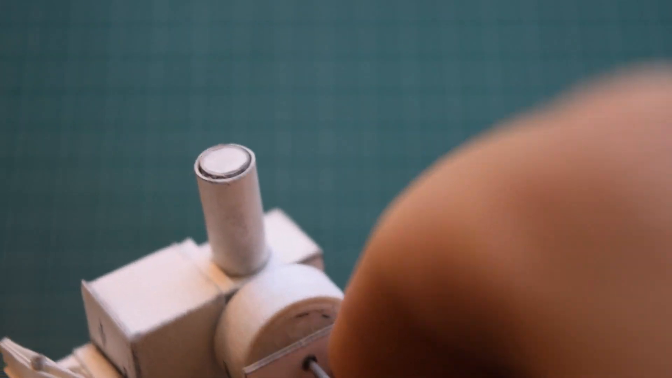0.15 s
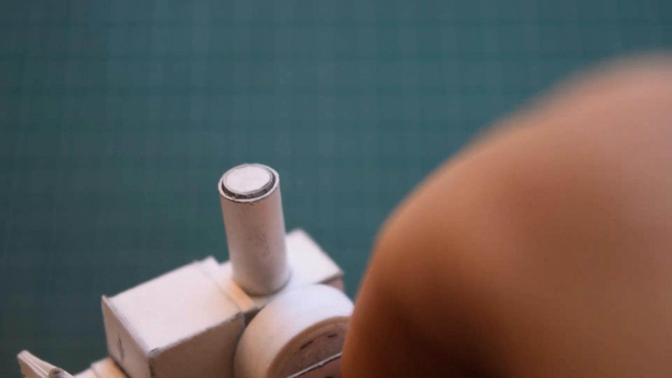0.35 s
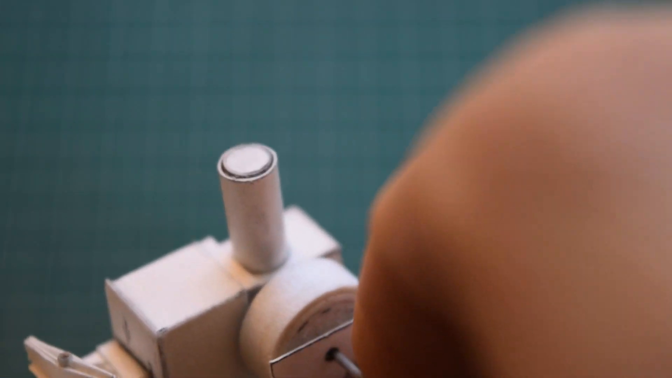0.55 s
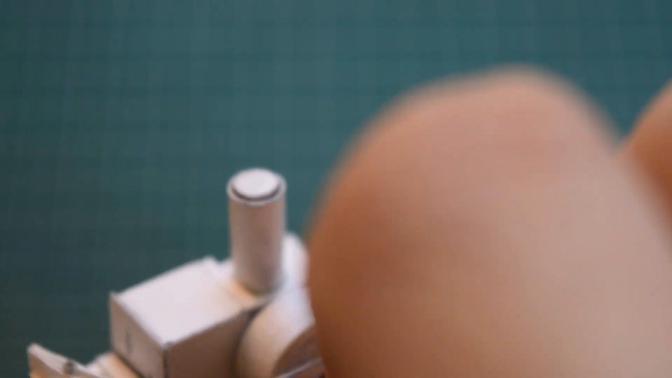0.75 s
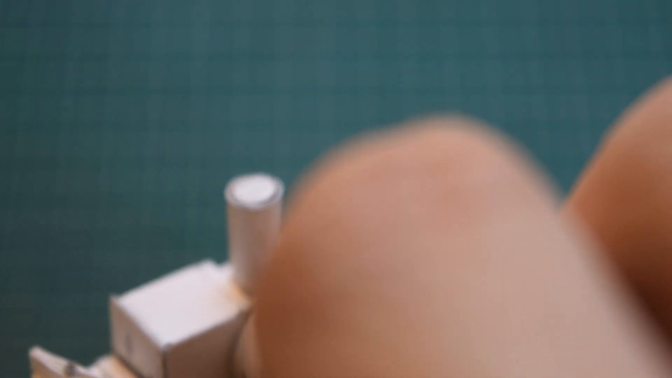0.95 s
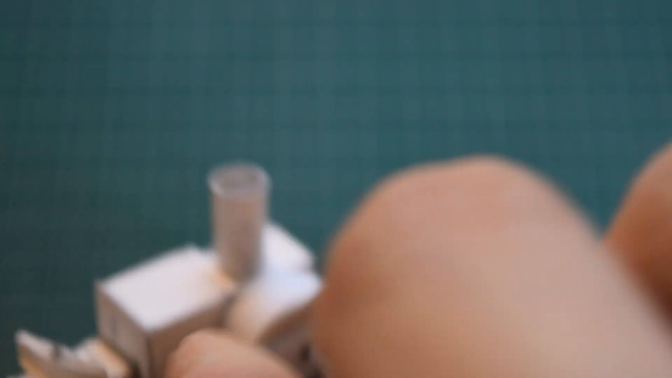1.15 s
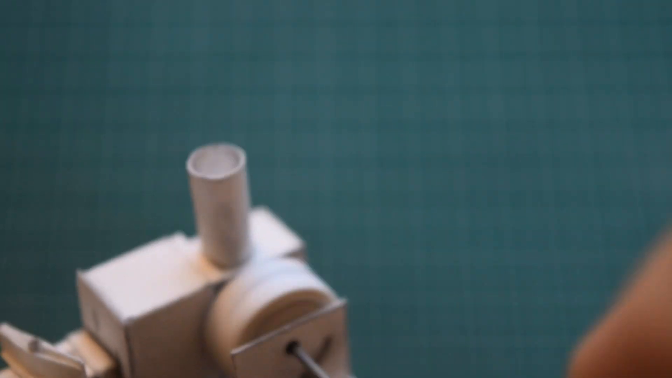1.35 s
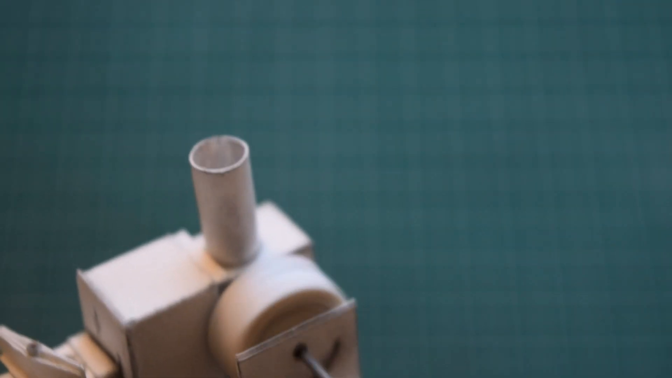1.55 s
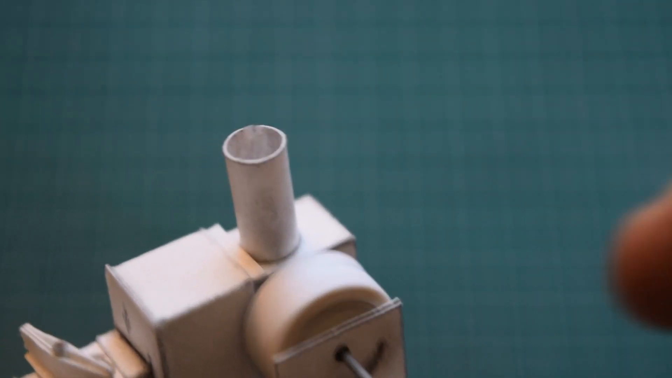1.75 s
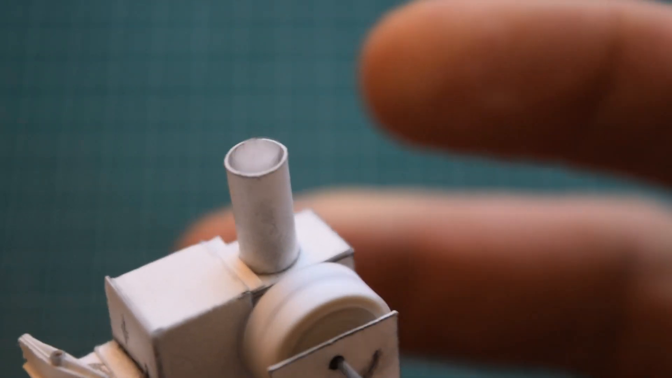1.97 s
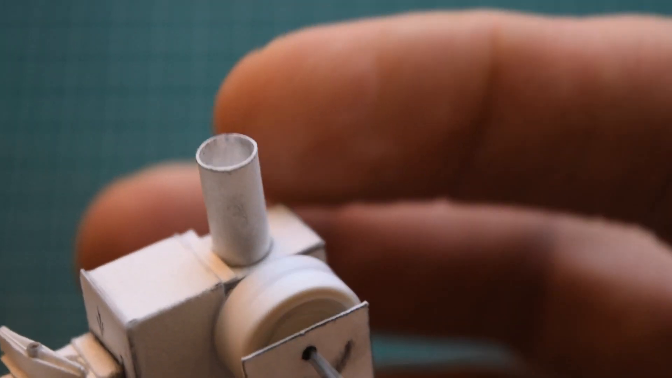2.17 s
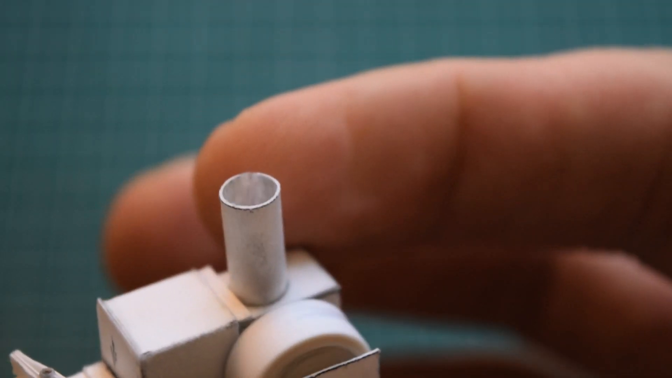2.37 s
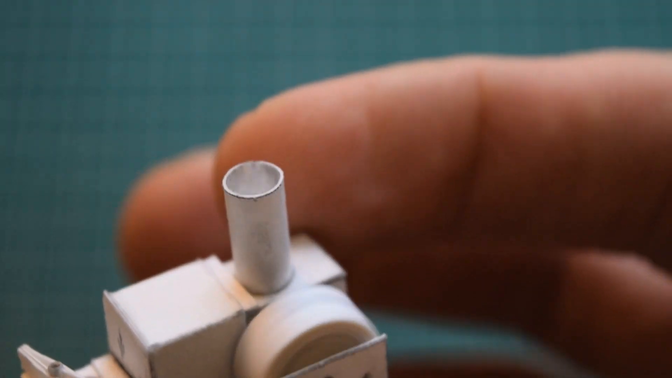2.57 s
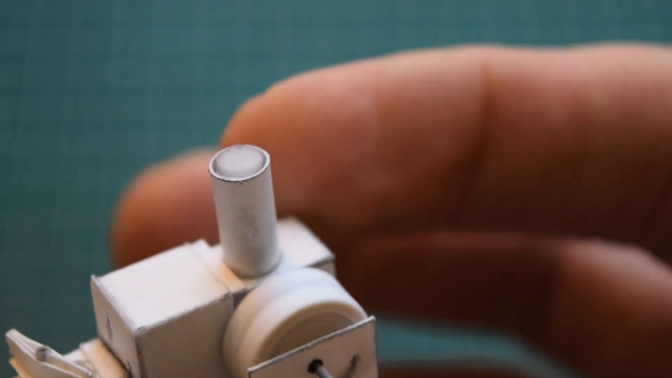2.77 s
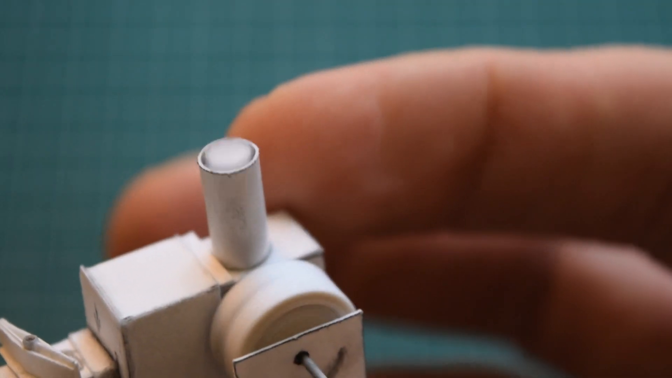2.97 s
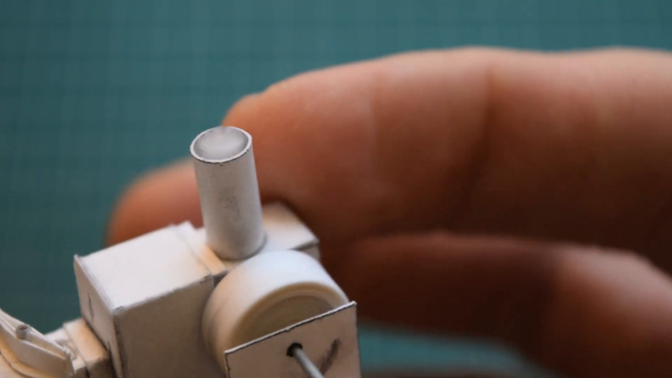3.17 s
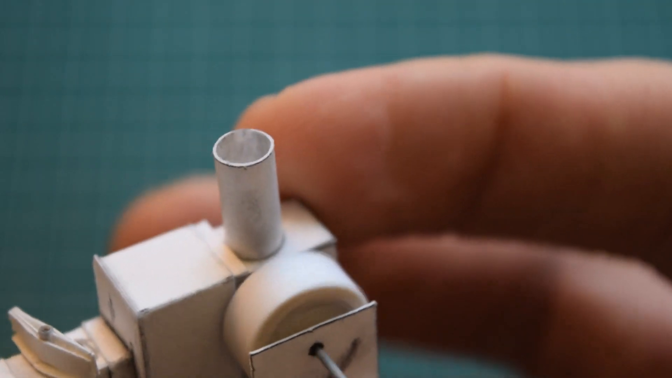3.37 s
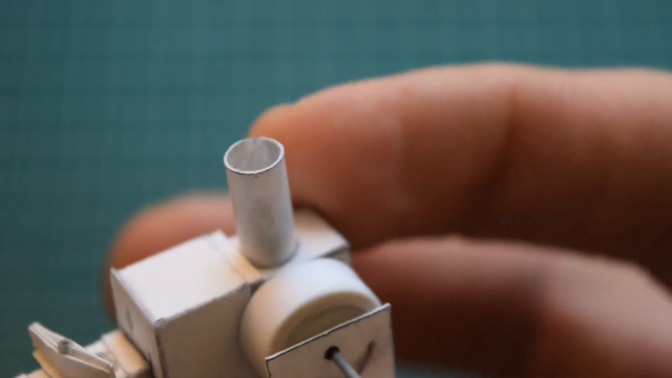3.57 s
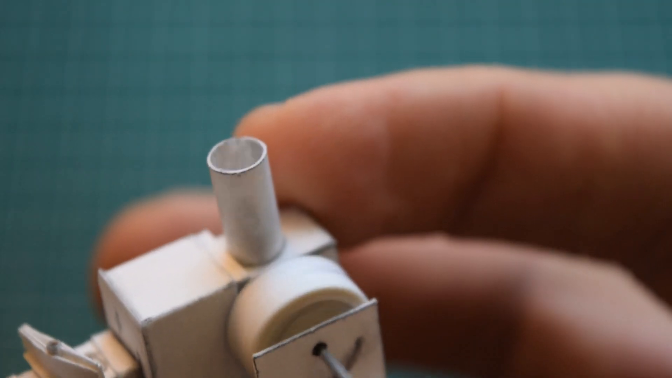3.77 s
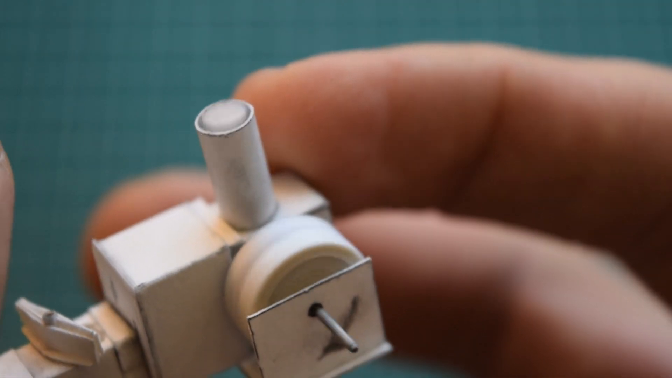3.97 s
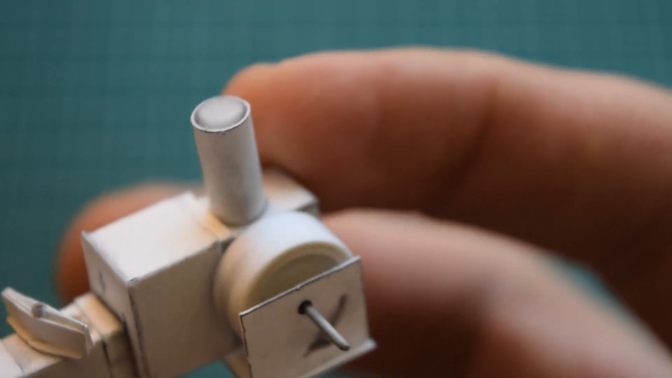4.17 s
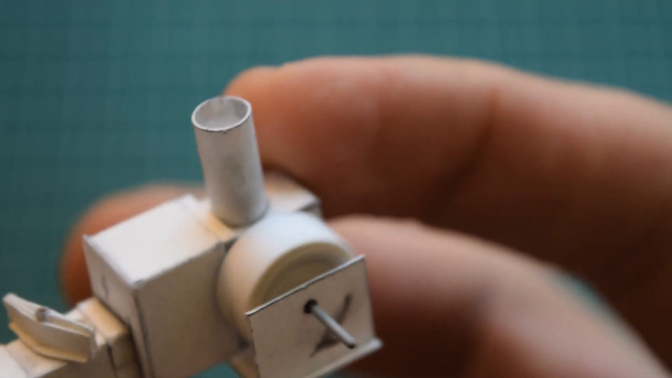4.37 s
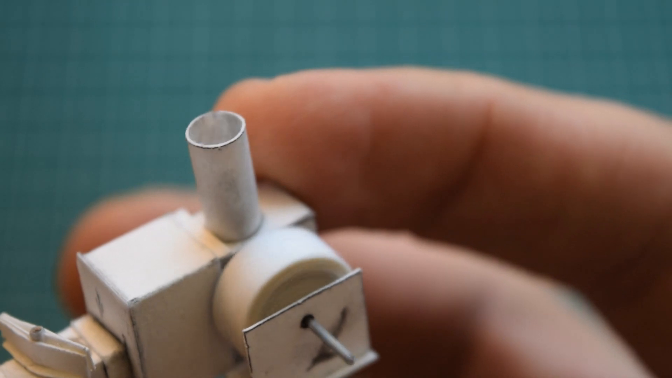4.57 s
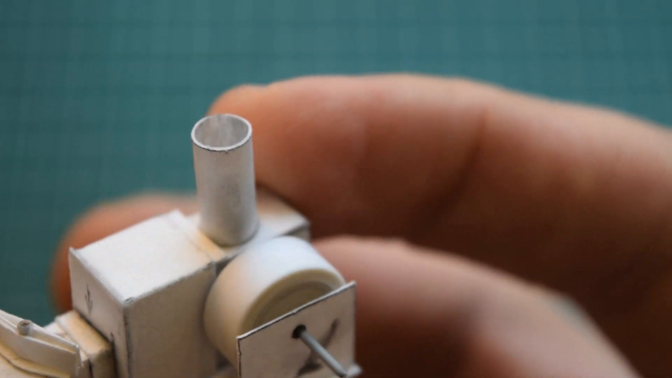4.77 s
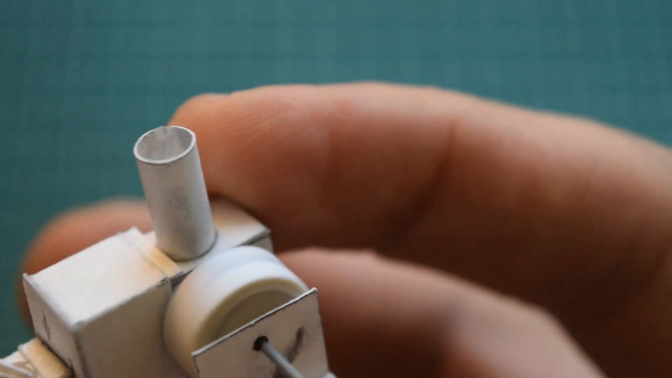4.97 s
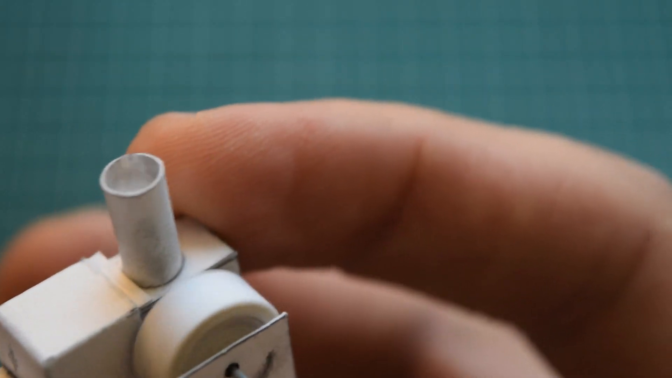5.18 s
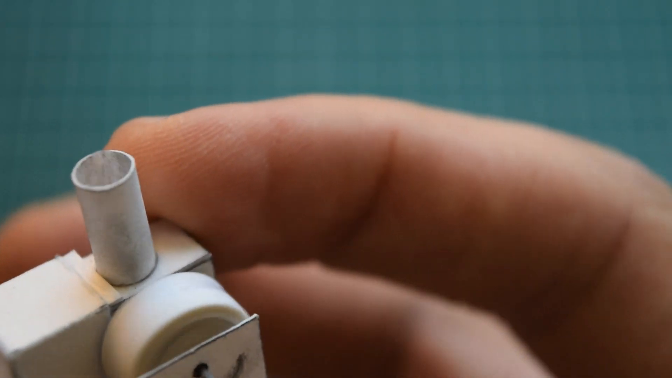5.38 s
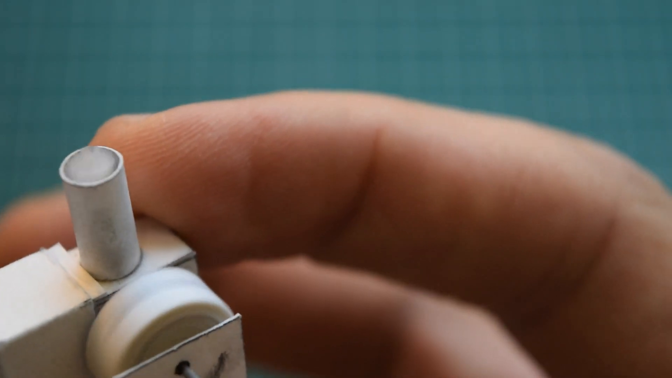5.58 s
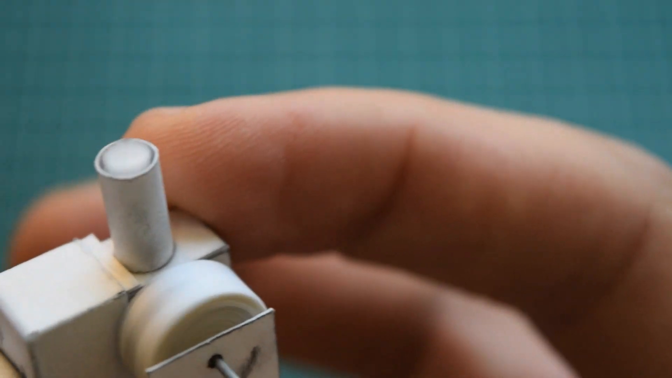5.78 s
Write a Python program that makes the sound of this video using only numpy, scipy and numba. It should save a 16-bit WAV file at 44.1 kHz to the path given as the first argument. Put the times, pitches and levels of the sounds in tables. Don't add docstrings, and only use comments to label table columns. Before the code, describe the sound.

Very close stereo pickup of a miniature air-driven motor above a table. Faint hiss and tiny finger touches come first. At about 1.1 seconds it springs into motion, briefly racing, then buzzes continuously: rapid papery flutter, hissing air jets and small thumps, slightly louder after half a second, wavering a little in speed, still running at the cut.

```python
import sys
import numpy as np
from scipy import signal
from scipy.fft import rfft, irfft
from scipy.io import wavfile
from scipy.ndimage import uniform_filter1d
from numba import njit

SR = 44100
rng = np.random.default_rng(int(sys.argv[2]) if len(sys.argv) > 2 else 0)


def store_wav(level_fs):
    pcm = np.round(np.clip(np.atleast_2d(level_fs), -1, 1) * 32767)
    wavfile.write(sys.argv[1], SR, pcm.T.astype(np.int16))


def makeup_ratio(level_db):
    decades = np.asarray(level_db, float) / 20
    return 10 ** decades


N = 257103
T = np.arange(N) / SR
HZ = np.arange(4097) * SR / 8192 + 1
START_S = 1.1
RUN_S = np.clip(T - START_S, 0, None)
CYLINDER_HZ, CYLINDER_HZ_PER_S = 1622, 66.5
CYLINDER_PATH_HZ = CYLINDER_HZ + CYLINDER_HZ_PER_S * RUN_S

# [start_s, speed_hz (turns per second)]
CRANK = [(1.1, 35.762), (1.84, 35.451), (2.02, 35.316), (2.23, 36.058), (2.29, 34.826), (2.68, 34.305),
         (3.13, 34.279), (3.28, 33.832), (3.61, 34.739), (3.91, 33.395), (4.09, 34.254), (4.27, 33.717),
         (4.6, 34.765), (4.75, 34.453), (4.93, 33.521), (5.08, 33.789), (5.62, 33.811), (5.83, 34.434)]
FLICK_HZ, FLICK_RISE_S, FLICK_FADE_S = 33.71, .0271, .0496


def crank():
    fade = np.exp(-np.clip(RUN_S - FLICK_RISE_S, 0, None) / FLICK_FADE_S)
    flick = np.clip(RUN_S / FLICK_RISE_S, 0, 1) * fade
    return np.interp(T, *np.transpose(CRANK), left=0) + FLICK_HZ * flick, flick


def valve_openings(speed_hz):
    turns = np.cumsum(speed_hz) / SR
    luck = rng.standard_normal((int(turns[-1]) + 1, 8))
    opening = np.interp(np.arange(len(luck)), turns, T) + .00075 + .00005 * luck[:, 7]
    period = 1 / np.interp(np.maximum(opening, START_S + 2 / SR), T, speed_hz)[:, None]
    return opening, period, luck


def flutter(opening, period, luck):
    chance = rng.standard_normal((2, len(luck), 8))
    gaps_s = .00198 * (1 + .03 * chance[0] + .008 * luck[:, 6:7])
    beat = .0012 + np.cumsum(gaps_s, axis=1)
    swing = np.exp(-((beat / period - .27) / .17) ** 2) * (beat < .39 * period)
    return clicks(opening[:, None] + beat, swing * makeup_ratio(1.6 * chance[1]))


def air_flow(opening, period, luck):
    turn = np.clip(np.searchsorted(opening, T) - 1, 0, None)
    share = (T - opening[turn]) / period[turn, 0]
    open_share = 0.46 + 0.004 * luck[turn, 0]
    shut = np.clip(share - open_share, 0, None)
    drain = 0.53 * np.exp(-shut / 0.037) + 0.11 * np.exp(-shut / 0.11)
    flow = (share > 0) * drain * makeup_ratio(0.81 * luck[turn, 5])
    swell = np.exp(-(np.minimum(share - .33, 0) / 0.25) ** 2)
    seep = makeup_ratio(-12.5) + 0.27 * np.exp(-np.abs(T - 1.13) / 0.22)
    return share, flow, swell, seep


def gust():
    return rng.standard_normal(N) * np.clip((T - 1.094) / 0.0083, 0, 1) ** 2


# [pitch_hz, width_hz, level_db]
BOX = [(590, 50, -14), (886, 74, 0), (998, 63, 0), (1090, 126, 2.5), (1403, 82, -0.5), (1550, 190, -4.5),
       (2314, 380, -5), (2694, 173, -3.5)]
# [pitch_hz, level_db]
OVERALL_TONE = [(100, -58), (400, -13.5), (520, -11.5), (620, 0.5), (900, 2.5), (1330, 3.5), (1400, -10),
                (1470, 1.5), (2330, 4), (2430, -5), (2540, -0.5), (10000, -2.5), (15500, -8.5)]


def paper_box(share, flow, swell, seep, flaps, puff, flick):
    soft_flaps = uniform_filter1d(flaps, size=9)
    soft_flaps = signal.lfilter([1, -1], [1, -np.exp(-1 / (0.000084 * SR))], soft_flaps)
    early = .3 + .7 * np.exp(-np.clip(share - .37, 0, None) / .05)
    jet = (flow * early * swell ** 0.2 * puff + 0.9 * seep) * gust()
    push = level(jet, 0) + level(soft_flaps, -8)
    box = colour(push, peaks(BOX) + slope(OVERALL_TONE))
    return box + 1.25 * flick * svf(box, 1100 + 0 * T, 200.)


# [pitch_hz, width_hz, level_db]
PASSAGE = [(1700, 267, 1), (3180, 300, 1), (3770, 230, 4.5), (4270, 890, -2.5), (5533, 58, 3),
           (6340, 78, -1.5), (6060, 7200, -7), (12200, 6800, -10.5)]


def valve_passage(flow, seep, opening, settled, luck):
    size = settled * makeup_ratio(1.3 * luck[:, 1:3]) * [1.05, .65]
    ticks = clicks(opening[:, None] + [.00022, .0017], size)
    push = level((flow + 1.53 * seep) * gust(), 0) + level(ticks, -6.5)
    low = 2.26 * svf(push, CYLINDER_PATH_HZ, 166.0)
    high = 1.55 * svf(push, 1.51 * CYLINDER_PATH_HZ, 130.)
    return colour(push + low + high, peaks(PASSAGE) + slope(OVERALL_TONE))


def cylinder_lift(opening, settled, luck):
    size = settled * makeup_ratio(1.8 * luck[:, 1:4]) * [1, .8, .6]
    hits = clicks(opening[:, None] + [.0003, .00142, .0042], size)
    ring = svf(hits, CYLINDER_PATH_HZ, 1500.) - .4 * svf(hits, 1.33 * CYLINDER_PATH_HZ, 400.)
    return svf(ring, CYLINDER_PATH_HZ, 380.)


# [pitch_hz, width_hz, level_db]
EDGE = [(7830, 160, -7), (8520, 160, 2), (9100, 340, 1), (9850, 300, 0), (11170, 1400, -9.5)]
WHISTLE_DB, WHISTLE_DB_PER_S = -8, -0.54
HAND_BACK_S, HAND_TILT_S = 1.68, 4.5


def edge_whistle(share, flow, swell, seep, puff):
    ahead = .4 * (share > .97)
    edge = colour((flow * swell * puff + ahead + 0.66 * seep) * gust(), peaks(EDGE) + slope(OVERALL_TONE))
    bare = np.clip((HAND_BACK_S - T) / .15, 0, 1)
    tilted = np.clip((T - HAND_TILT_S) / .5, 0, 1)
    bare_ring = 0.57 * svf(edge, 9280 + 0 * T, 330.0)
    tilt_ring = 0.58 * svf(edge, 8000 + 0 * T, 500.) - 0.59 * svf(edge, 8650 + 0 * T, 300.)
    edge = edge + bare * bare_ring + tilted * tilt_ring
    return level(edge, 0) * makeup_ratio(WHISTLE_DB + WHISTLE_DB_PER_S * RUN_S)


KNOCKS = [
    (0.002, 1.35),
    (0.392, -0.95),
]
# [pitch_hz, level_db]
CUSHION = [(30, -46), (90, -24.5), (135, -24.5), (200, -23.5), (300, -13), (350, -18.5), (412, -3.5),
           (470, -12), (560, 2.5), (830, 5.5), (960, -4), (1300, -34.5), (5000, -65)]
LID_HZ, LID_WIDTH_HZ, LID_DB = 822, 60., -14


def flow_thumps(opening, period, luck):
    at, size = np.transpose(KNOCKS)
    knocks = clicks(opening[:, None] + at * period, size * makeup_ratio(1.0 * luck[:, 3:5]))
    lid = svf(svf(knocks, LID_HZ + 0 * T, LID_WIDTH_HZ), LID_HZ + 0 * T, 200.0)
    return level(colour(knocks, slope(CUSHION)), -11) + level(lid, LID_DB)


# [pitch_hz, level_db]
EDDIES = [(30, -25), (250, -59), (500, -20), (1100, -40), (1800, 6), (2400, -11), (3200, -0.5),
          (5500, -7.5), (7300, -5.5), (8500, 0.5), (10000, -0.5), (12000, -8), (15500, -18)]


def port_eddies(flow, swell, seep):
    return level(colour((flow * swell + 0.73 * seep) * gust(), slope(EDDIES)), -14.5)


LIFT_DB = -8


def motor():
    speed_hz, flick = crank()
    opening, period, luck = valve_openings(speed_hz)
    settled = np.clip((opening - START_S) / 0.13, .05, 1)[:, None]
    flaps = flutter(opening, period, luck)
    puff = 1 + 0.98 * signal.lfilter([1], [1, -np.exp(-1 / (0.0004 * SR))], flaps)
    share, flow, swell, seep = air_flow(opening, period, luck)
    tone = level(paper_box(share, flow, swell, seep, flaps, puff, flick), 0)
    tone = tone + level(valve_passage(flow, seep, opening, settled, luck), -5.5)
    tone = tone + level(cylinder_lift(opening, settled, luck), LIFT_DB)
    tone = tone + edge_whistle(share, flow, swell, seep, puff)
    tone = tone + flow_thumps(opening, period, luck)
    return tone, port_eddies(flow, swell, seep)


# [start_s, level_db, pitch_hz, width_hz, length_s]
TOUCHES = [(.175, -58, 9000, 1500, .004), (.438, -53, 9000, 4000, .005), (0.524, -52, 5700, 350, .003),
           (.531, -53, 5700, 350, .005), (0.53, -56, 8500, 5000, .012), (.44, -59, 590, 60, 0.022),
           (.52, -57, 3440, 200, .02), (0.794, -52, 620, 60, 0.02), (0.796, -57, 350, 60, 0.02),
           (.905, -62, 9000, 4000, .004), (4.355, -45, 367, 60, 0.026)]


def finger_touches():
    grit = rng.standard_normal(N)
    out = np.zeros(N)
    for start_s, level_db, pitch_hz, width_hz, length_s in TOUCHES:
        rub = np.exp(-((T - start_s - length_s) / length_s) ** 2 * 2) * grit
        gain = makeup_ratio(level_db) * np.sqrt(SR / np.pi / width_hz)
        out = out + gain * svf(rub, pitch_hz + 0 * T, 1. * width_hz)
    return out


# [pitch_hz, level_db (per Hz)]
LEAK = [(20, -13.5), (100, -22), (250, -18), (420, -17), (550, -9), (700, -13), (800, 1), (1100, -0.5),
        (1650, -1.5), (1900, -8), (3500, -16.5), (5000, -23.5), (11500, -24), (15500, -32)]
# [pitch_hz, level_db]
LEAK_SIDE = [(60, -1), (110, -6), (200, -19), (380, -16), (700, -15), (1290, -18.5), (2380, -4),
             (4400, -4.5), (8120, -5), (15000, -2)]
LEAK_DB = -48


def leaking_air():
    mid = level(colour(rng.standard_normal(N), slope(LEAK)), LEAK_DB)
    side = level(colour(rng.standard_normal(N), slope(LEAK)), LEAK_DB)
    return mid + np.array([[1], [-1]]) * colour(side, slope(LEAK_SIDE))


# [pitch_hz, level_db, width_hz]
HUM = [(129, -69.5, 6.3), (171, -75, 4.8), (523.4, -66.5, 1.8), (2210, -64.5, 5.2), (3350, -67, 170)]


def fan_hum():
    return sum(level(svf(rng.standard_normal(N), pitch_hz + 0 * T, 1. * width_hz), level_db)
               for pitch_hz, level_db, width_hz in HUM)


def echoes(x, t60, start):
    s = np.arange(SR // 3) / SR
    tail = rng.standard_normal(len(s)) * makeup_ratio(-60 * s / t60) * (s >= start)
    return signal.oaconvolve(x, tail / np.sqrt(np.sum(tail ** 2)))[:N]


def level(x, db):
    return x * makeup_ratio(db) / np.sqrt(np.mean(x ** 2))


@njit
def svf(x, hz, width):
    y, b, l = np.empty(len(x)), 0., 0.
    for i in range(len(x)):
        g, k = np.tan(np.pi * hz[i] / SR), width / hz[i]
        v = (b + g * (x[i] - l)) / (1 + g * (g + k))
        b, l, y[i] = 2 * v - b, l + 2 * g * v, k * v
    return y


def colour(x, db):
    fold = irfft(np.log(makeup_ratio(db)))
    fold[1:4096] *= 2
    fold[4097:] = 0
    return signal.oaconvolve(x, irfft(np.exp(rfft(fold))))[:N]


def clicks(s, size):
    place = np.clip(np.ravel(s) * SR, 0, N - 2)
    i, size = place.astype(int), np.ravel(size) * (place < N - 2)
    return np.bincount(i, size * (1 + i - place), N) + np.bincount(i + 1, size * (place - i), N)


def slope(points):
    hz, db = np.transpose(points)
    return np.interp(np.log(HZ), np.log(hz), db)


def peaks(modes):
    return 10 * np.log10(sum(makeup_ratio(2 * db) / (1 + (2 * (HZ - hz) / width) ** 2) for hz, width, db in modes))


# [start_s, level_db (of the jet)]
AIR = [
    (1.1, -27),
    (1.14, -26.5),
    (1.25, -26.5),
    (1.6, -24.5),
    (5.83, -24),
]


def scene():
    start_s, jet_db = np.transpose(AIR)
    near, side = np.array(motor()) * makeup_ratio(np.interp(T, start_s, jet_db))
    table = makeup_ratio(-13.) * np.interp(T - .0062, T, near)
    mid = near + table + makeup_ratio(-14.5) * echoes(near, t60=0.11, start=0.00251)
    background = finger_touches() + leaking_air() + fan_hum()
    return mid + np.array([[1], [-1]]) * (side - 0.0025 * near) + background


def roll_off(x):
    return signal.sosfilt(signal.butter(12, 15880, fs=SR, output="sos"), x)


def record(dry):
    cut = signal.sosfilt(signal.ellip(8, .3, 60, 15750, fs=SR, output="sos"), dry)
    return roll_off(cut - .0029)


dry = scene()
out = record(dry)
store_wav(out)
```